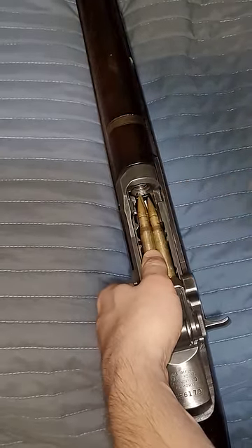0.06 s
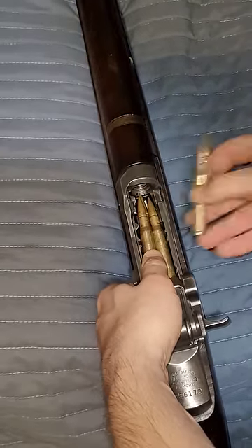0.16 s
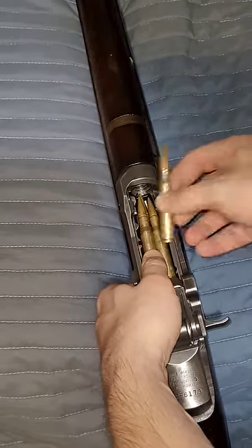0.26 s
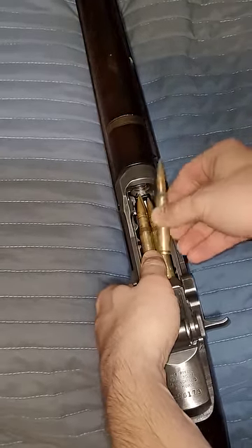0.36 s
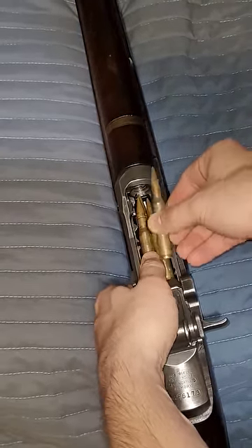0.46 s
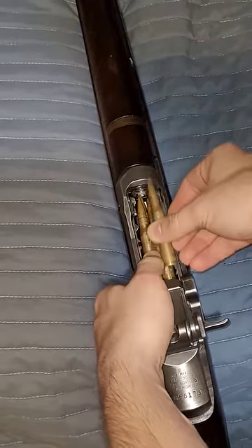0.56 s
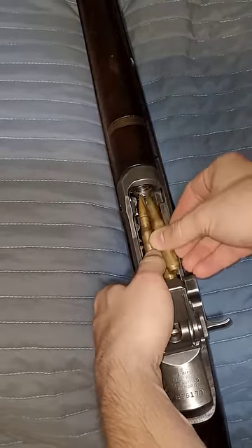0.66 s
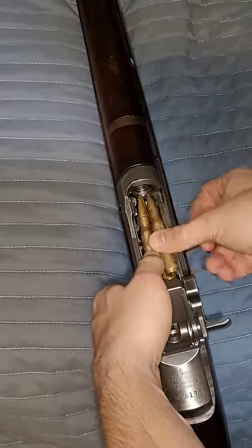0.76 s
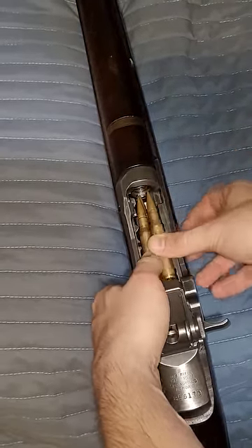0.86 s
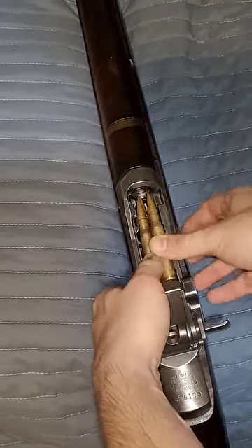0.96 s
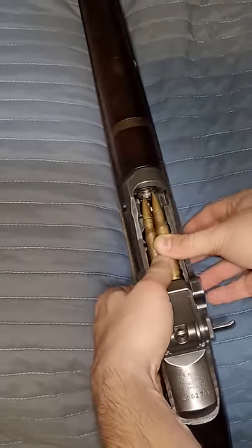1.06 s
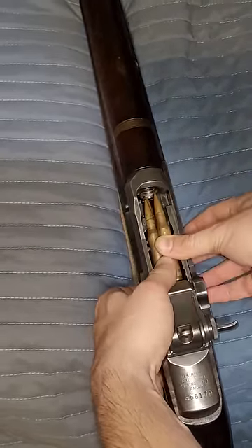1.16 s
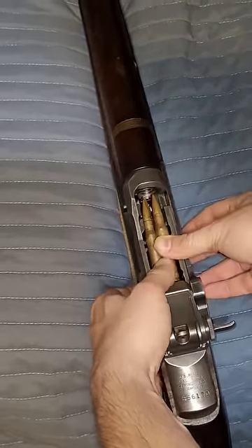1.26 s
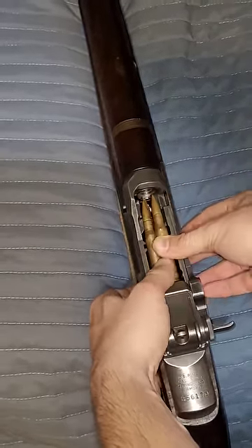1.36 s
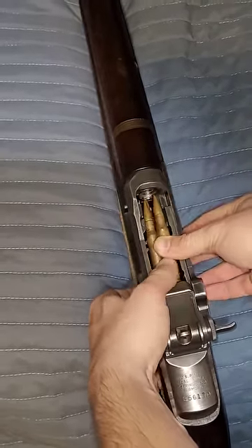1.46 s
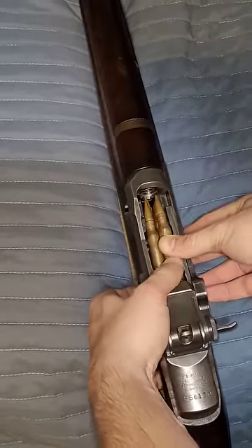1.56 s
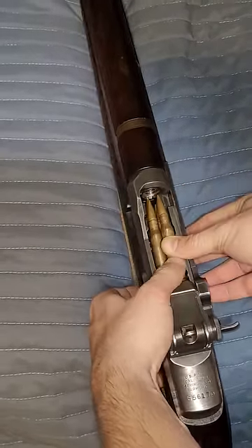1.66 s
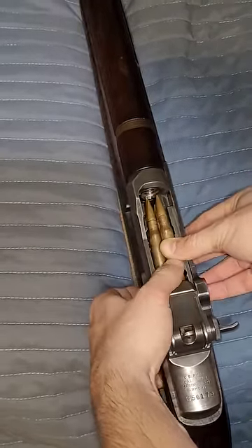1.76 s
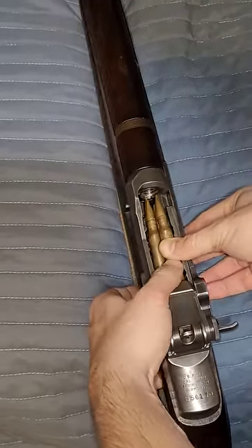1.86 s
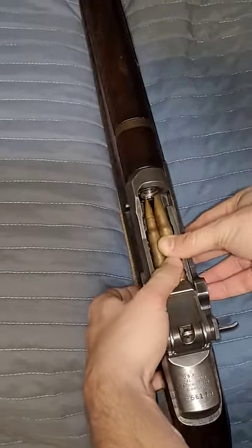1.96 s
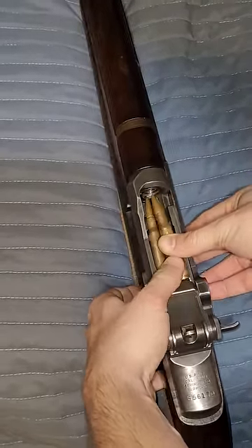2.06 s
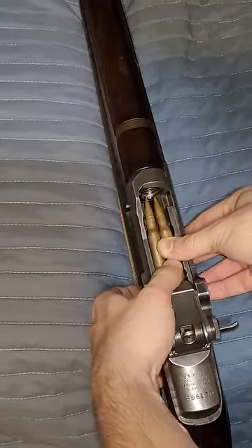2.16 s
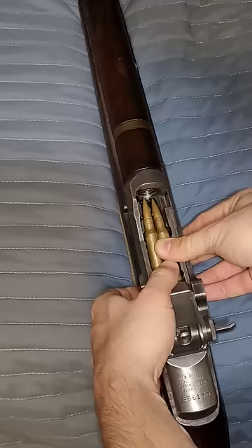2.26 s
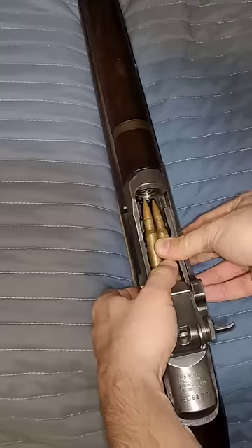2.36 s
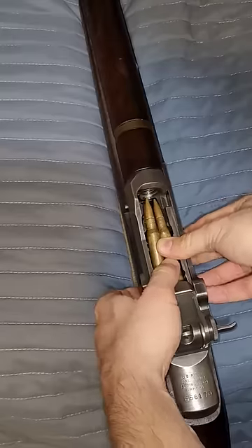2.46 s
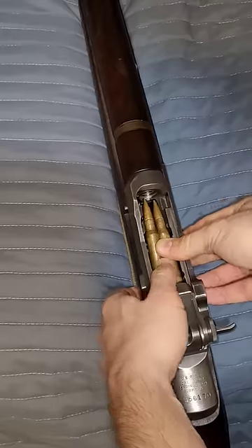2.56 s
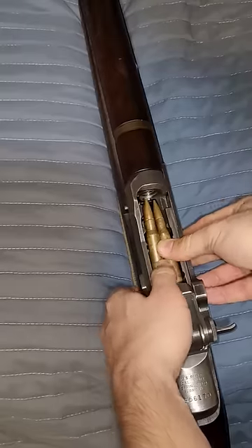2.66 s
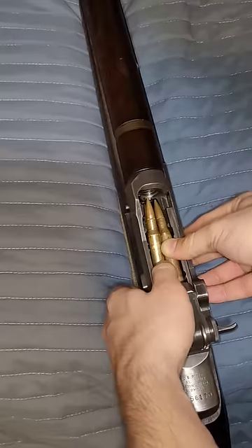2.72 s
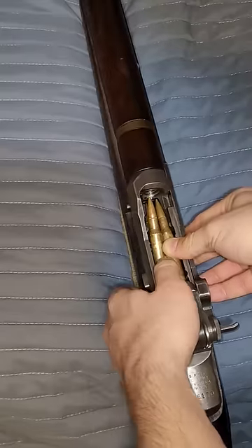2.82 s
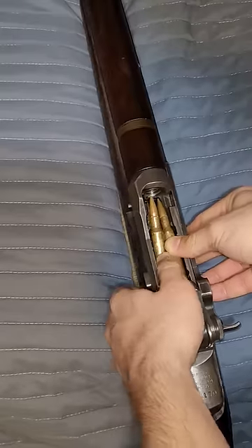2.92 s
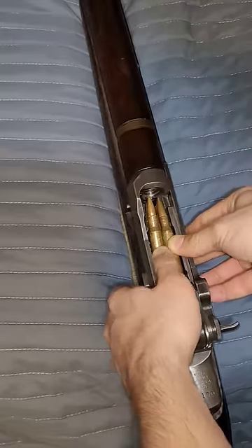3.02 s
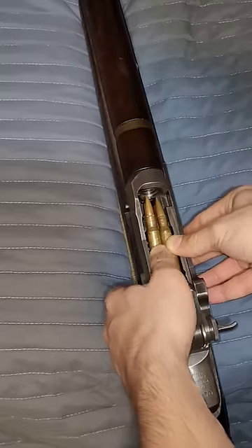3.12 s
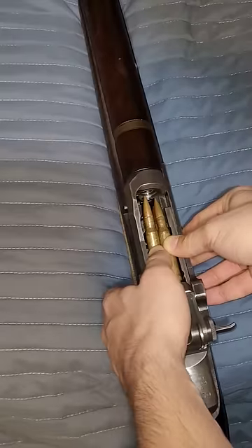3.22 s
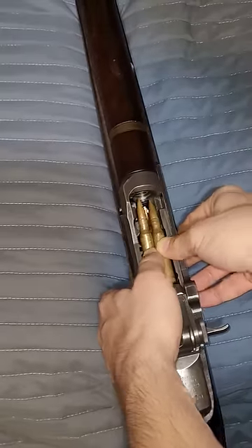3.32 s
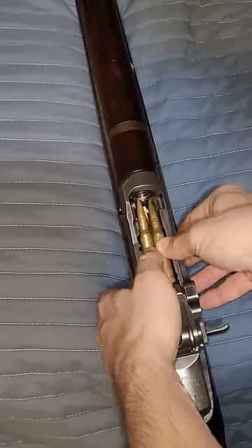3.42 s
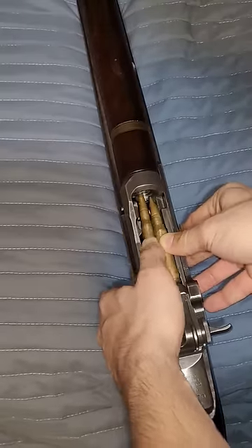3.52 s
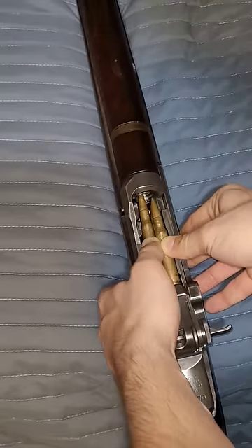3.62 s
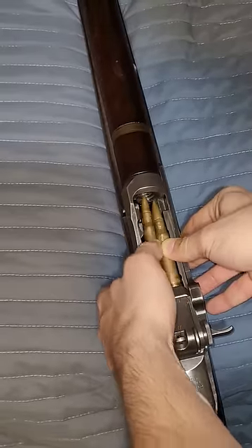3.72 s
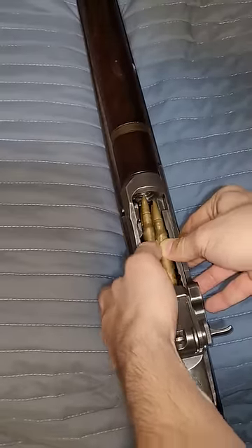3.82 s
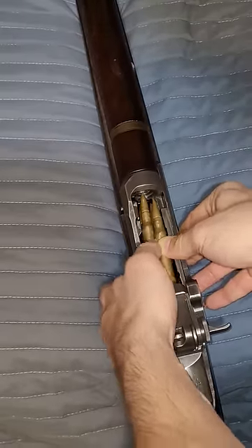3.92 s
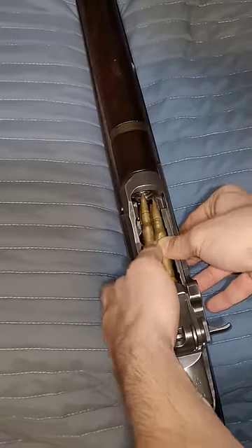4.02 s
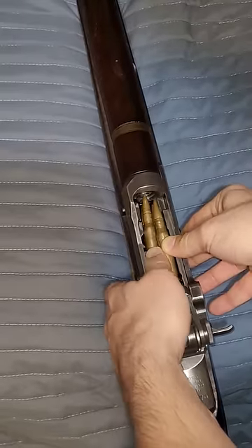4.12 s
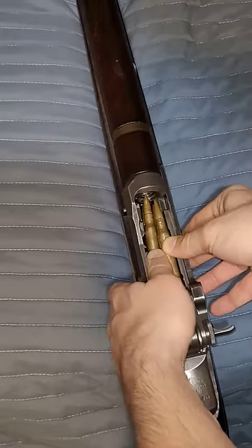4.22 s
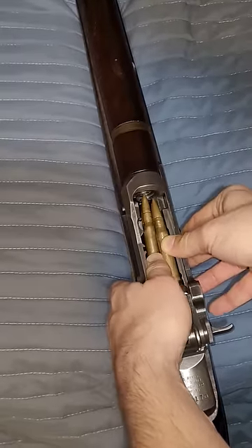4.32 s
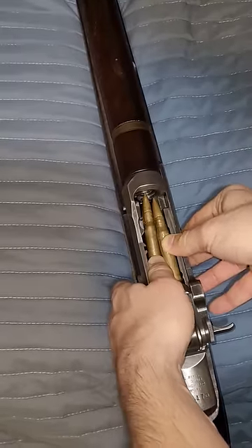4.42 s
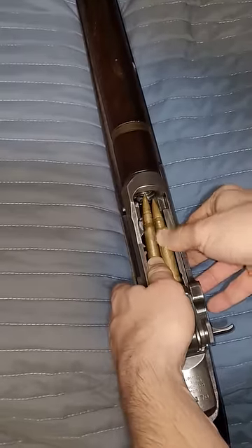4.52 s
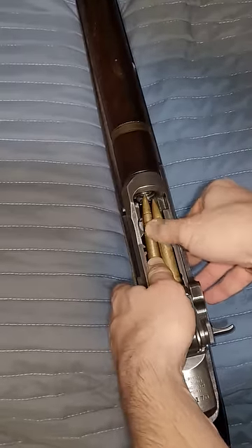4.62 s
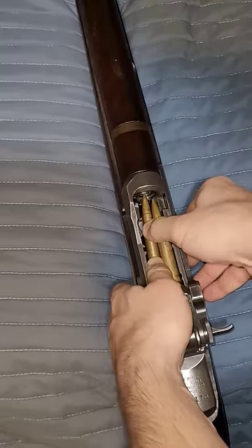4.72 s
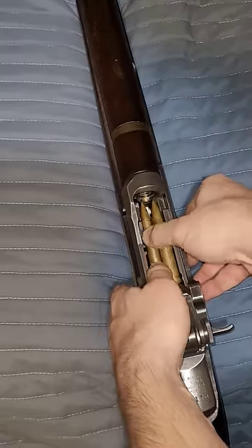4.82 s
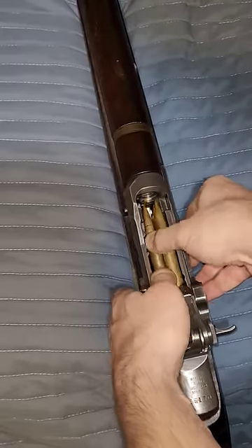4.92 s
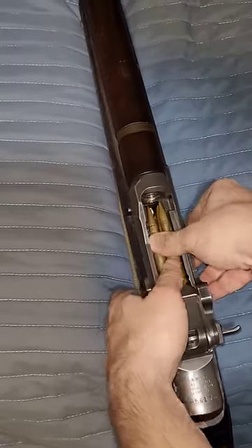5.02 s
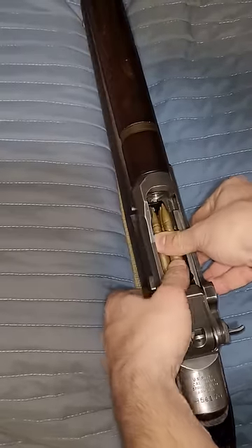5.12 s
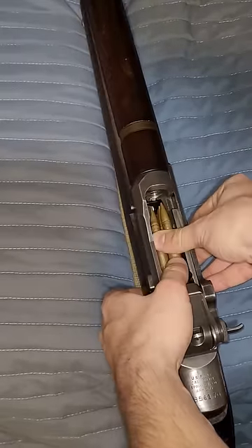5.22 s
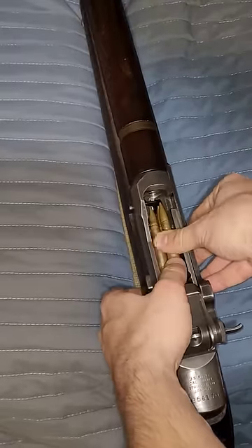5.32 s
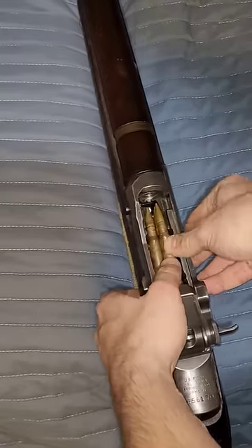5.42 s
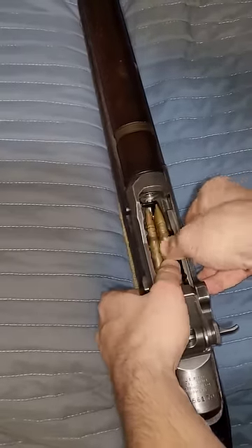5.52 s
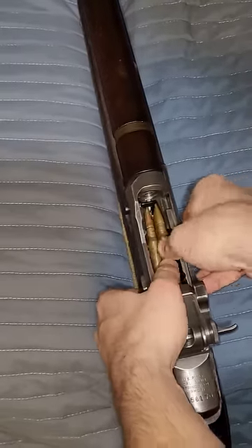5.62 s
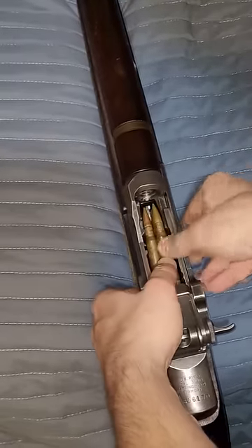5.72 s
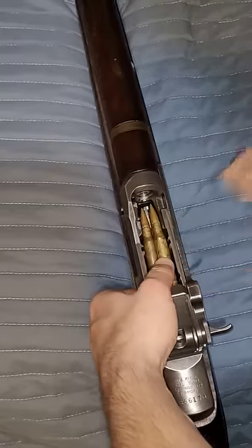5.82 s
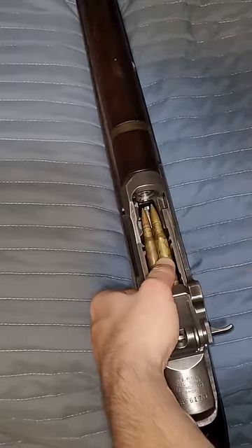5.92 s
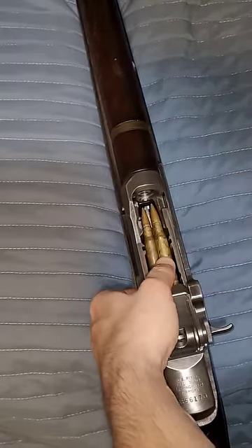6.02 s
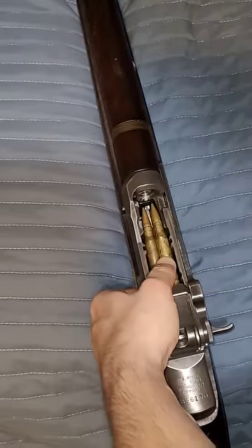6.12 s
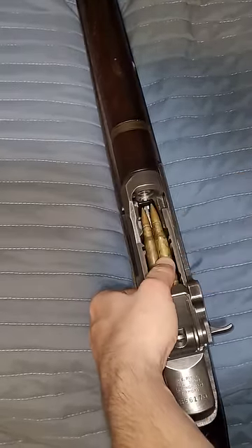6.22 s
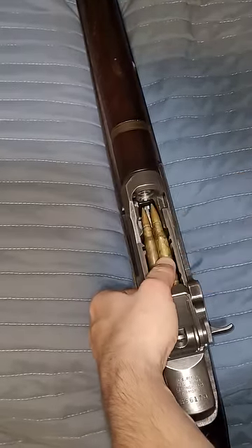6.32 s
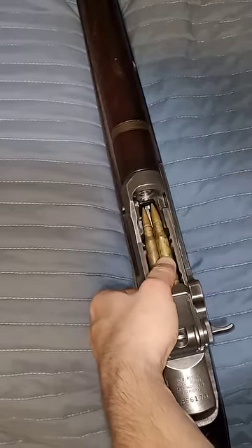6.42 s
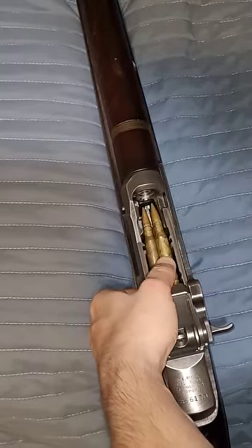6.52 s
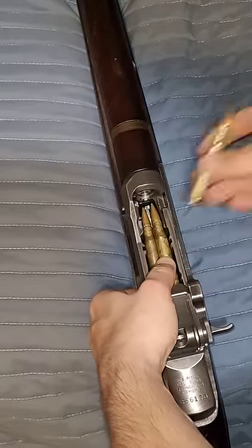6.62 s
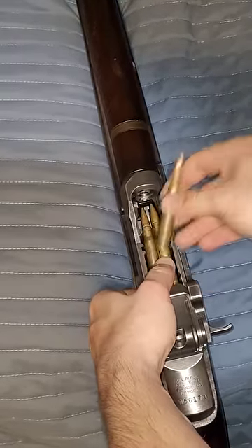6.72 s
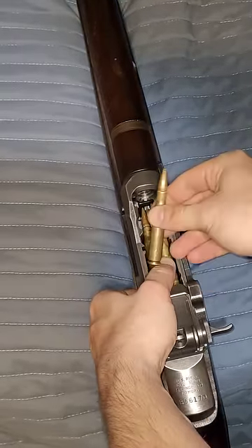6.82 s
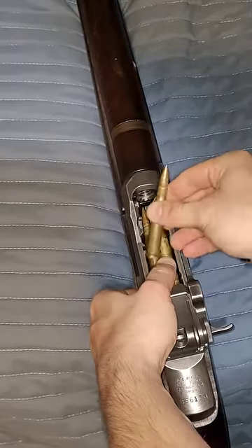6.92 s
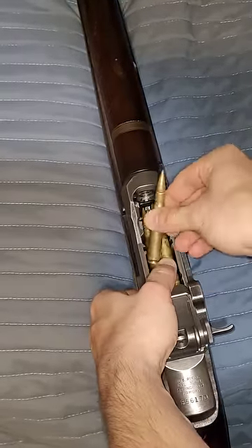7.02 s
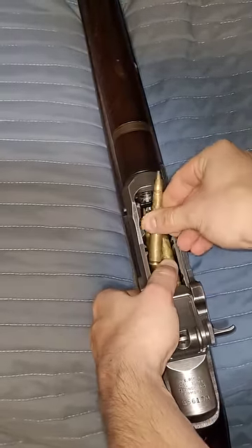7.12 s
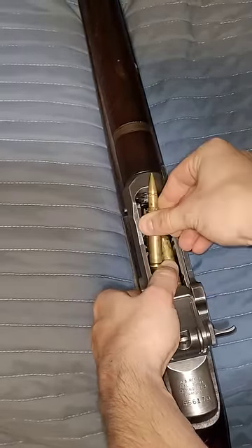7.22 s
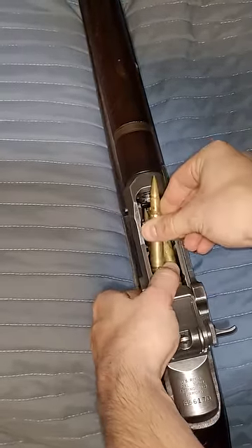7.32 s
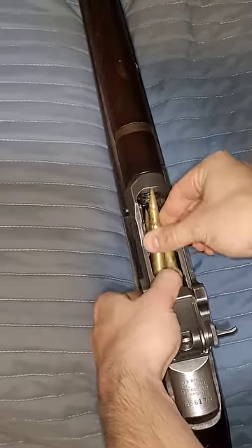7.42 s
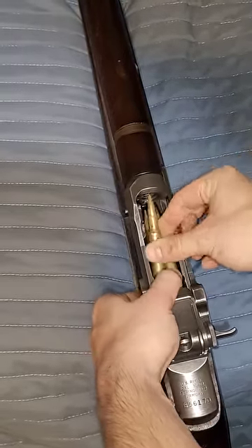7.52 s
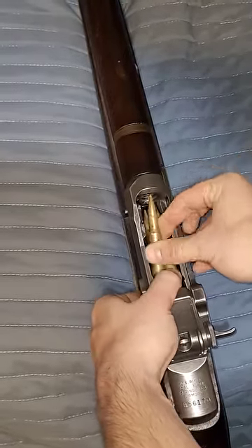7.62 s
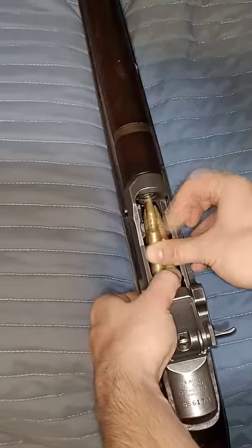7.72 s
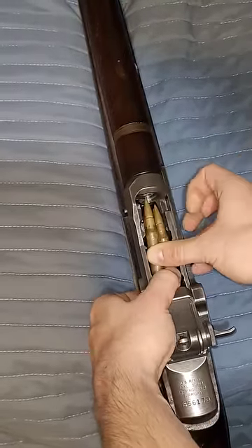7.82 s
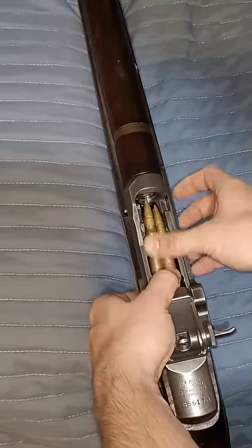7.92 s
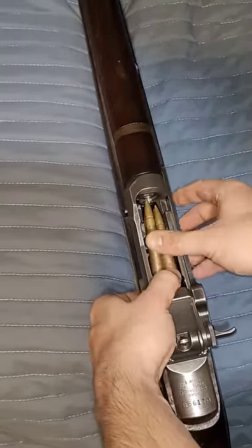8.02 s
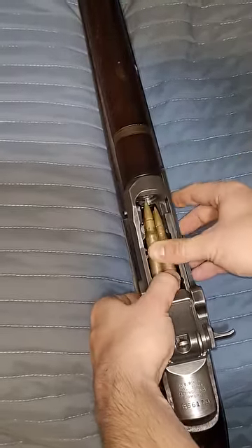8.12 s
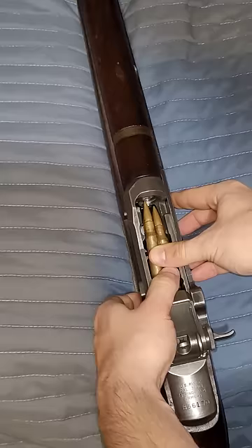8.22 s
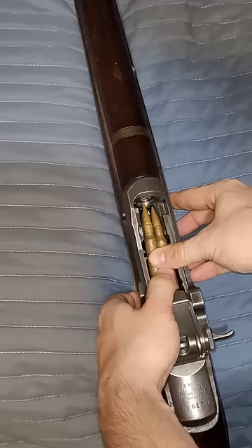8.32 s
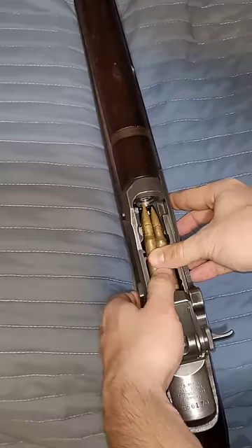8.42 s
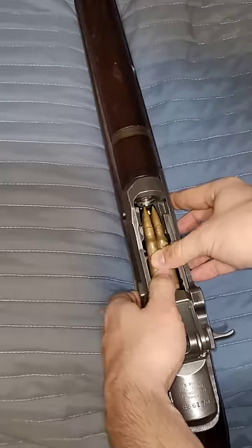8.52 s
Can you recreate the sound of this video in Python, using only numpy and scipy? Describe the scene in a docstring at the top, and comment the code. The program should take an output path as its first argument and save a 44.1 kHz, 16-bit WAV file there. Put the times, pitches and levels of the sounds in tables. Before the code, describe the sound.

Close to a stereo microphone in a small, softly furnished room, cartridges are thumbed into a steel rifle magazine. Crisp, dry clicks and small rattles come irregularly, with one bright hard snap near the start and short gritty scrapes. After a pause, loose rounds jingle lightly, more clicks follow, and the loudest clack brings a metallic clang and dull thud. Small ticks end it over a constant low fan hum.

```python
"""Loading a rifle magazine

Brass cartridges are thumbed into the steel magazine of a rifle that lies on a bed, close to two microphones.
Each contact is a dry click: shaped noise bursts excite case resonances, then the steel receiver and room ring.
Cases scrape as trains of tiny slips, hard blows add a clang and a thud, and spare rounds jingle once as
dying modes. A hand brushes the quilt as filtered noise; a fan of sine lines and noise hums in the small, soft room."""
import sys
import numpy as np
from scipy import signal
from scipy.fft import rfft, irfft
from scipy.io import wavfile
from scipy.ndimage import uniform_filter1d

SR = 44100
rng = np.random.default_rng(int(sys.argv[2]) if len(sys.argv) > 2 else 0)


def unload_audio(sound):
    """Save the sound as a 16-bit wav file, at the path given as the first command line argument."""
    columns = np.transpose(np.atleast_2d(sound))
    # keep every value between -1 and 1, then stretch to whole-number steps
    steps = np.round(np.clip(columns, -1, 1) * 32767)
    wavfile.write(sys.argv[1], SR, steps.astype(np.int16))


N = 377937  # length of the scene [samples]
TAPS = 2048  # length of a burst and of a colouring filter [samples]
HZ = np.fft.rfftfreq(TAPS, 1 / SR)  # frequency grid of every gain curve [Hz]
LEVEL_SAMPLES = 220  # the level of a short blow is its rms over this span [samples]

# broad resonances of a case held against the steel: (frequency [Hz], width [Hz], level [dB])
CASE_RESONANCES = [(690, 210, 0.5), (1190, 82, -5), (1355, 160, 4), (1892, 200, -2), (2290, 240, 1),
                   (3200, 410, -1), (3820, 560, 1), (4430, 390, 1), (5340, 490, 3), (6027, 450, 2.5),
                   (6900, 800, -4.5), (8340, 930, -4), (9210, 400, -6), (11180, 1700, -12.5),
                   (13550, 1680, -8.5)]


def clicks(same=.7, place_db=2.5, valley_db=-21, grip_width=0.88, ping_db=6):
    """Impact excitation: a blow and its fast chatter sound a low knock, a main clack and a bright tick, then ring on."""
    # a cartridge snaps against the steel or its neighbours: (time [s], clack level [dB], clack pitch [Hz],
    # clack breadth [octaves], knock and tick [dB re clack, before their trims],
    # chatter [ms, before the shortest length is added])
    snaps = [(0.427, -28, 3840, 0.52, -32, -9.5, 1.04), (0.5852, -44.5, 2720, 0.99, -16, -12, 3.8),
             (0.64, -43, 3300, 1.2, -18, -24, 2.2), (0.7124, -25, 2940, 2.2, -6, -1, 0.92),
             (0.7195, -21.5, 3400, 2.2, -20.5, -4, 2.5), (0.9167, -13, 7850, 1.09, -31, -0.5, 0.94),
             (1.063, -56, 3400, 0.88, -0.5, 2.5, 1.2), (1.1526, -37.5, 4100, 0.6, -14, -2.5, 1.5),
             (1.2677, -47.5, 2360, 0.9, -4, -7.5, 2.3), (1.6042, -44.5, 2320, 0.59, -7, -11.5, 0.9),
             (1.6262, -38, 3200, 0.53, -28, -24, 0.35), (1.7136, -47.5, 2400, 0.78, -13, -21, 2.1),
             (1.844, -40.5, 3090, 0.92, -21.5, -13.5, 0.75), (2.0207, -31.5, 3730, 0.55, -16, -10, 0.55),
             (2.0402, -30.5, 2950, 1.9, -10.5, -11, 5.6), (2.0467, -23, 5260, 1.7, -19, -12, 0.66),
             (2.0883, -39.5, 2700, 1.3, -6, -9, 1.3), (2.1544, -34.5, 2590, 1.7, -4.5, -2, 1.3),
             (2.1637, -30.5, 2500, 0.91, -8, -18, 3), (2.1755, -28.5, 5900, 2.1, -19, -12, 0.62),
             (2.341, -40, 2360, 0.88, -6, -11.5, 1.15), (2.7357, -20, 5720, 1.08, -29.5, -18.5, 0.22),
             (2.988, -17.5, 5600, 0.83, -25.5, -16, 0.37), (3.5304, -20.5, 6670, 0.47, -25.5, -18, 0.4),
             (3.54, -24.5, 6700, 2.6, -11.5, 1.5, 3.3), (3.5505, -24.5, 5500, 2.6, -21, -6, 0.63),
             (3.6015, -47.5, 3200, 2, -22, -15, 0.9), (3.6453, -54.5, 2500, 2.2, 1.5, -2.5, 1.7),
             (3.8093, -41.5, 6500, 2.3, -26.5, -20, 1.2), (4.1615, -37, 5770, 0.31, -23, -12, 0.22),
             (4.4637, -28.5, 5370, 0.82, -20, -21.5, 0.25), (4.8352, -37, 2900, 0.76, -24, -18, 1.1),
             (4.8744, -42.5, 2500, 3, -14, -13, 0.5), (4.9438, -38, 2660, 0.89, -21, -17, 0.5),
             (5.0355, -51, 6300, 2.2, -4, -6.5, 1.25), (5.332, -40, 2290, 0.86, -20, -32, 0.67),
             (5.3563, -43.5, 6500, 2.5, -19, -23, 1.3), (5.4345, -53.5, 2300, 0.9, -12.5, -37.5, 1.8),
             (5.566, -55, 2310, 0.9, -7, -14.5, 1.7), (5.747, -30.5, 2400, 2.2, -23, -15, 1.1),
             (6.9092, -28.5, 3290, 1.6, -27, -16, 0.49), (6.93, -28.5, 4000, 0.7, -17.5, -20, 0.63),
             (6.9935, -26.5, 3020, 1.36, -22, -19, 4.3), (7.0867, -52, 5610, 1.5, -12, -13.5, 0.54),
             (7.5095, -24.5, 4150, 3.4, -20.5, -6.5, 2.15), (7.7924, -13, 6170, 3.1, -15, -1.5, 1.54),
             (8.2349, -43.5, 2400, 0.56, -4, -16, 0.69), (8.2875, -36.5, 2250, 1.2, -15, -15, 1.4),
             (8.3676, -37.5, 3000, 1.6, -11.5, -8, 1.8), (8.3897, -33.5, 3500, 0.8, -23, -15, 0.59),
             (8.4745, -50.5, 2290, 0.92, -17.5, -35, 1.2)]
    # ringing of the steel receiver: (frequency [Hz], level [dB], varied at each blow)
    steel_modes = [(2100, -6), (2291, -3), (2790, -5.5), (3850, -3.5), (4215, -8), (4352, -4.5),
                   (4690, -4.5), (4854, -5.5), (5220, -2), (5327, -7), (5981, -7.5), (6299, -5.5),
                   (6846, -4.5), (7644, -6.5), (8284, 0), (8646, 1.5), (9095, -1.5)]
    steel_t60 = .17  # s
    knock_trim_db, tick_trim_db, tick_left_db = 1, -1, 1  # the tick is tilted towards the left
    knock_ms = 3  # extra decay time of the knock
    soft_db, soft_hz, hard_db, hard_hz = -42, 9500, -22.5, 15000
    steel_db, room_db = -12, -1  # shares of the after-ring
    ring_at_db, ring_db_there, ring_db_per_db = -36, -8, -0.03  # a firmer thumb damps the after-ring more
    out, ms = np.zeros((2, N)), np.arange(TAPS) * 1000 / SR
    for s, db, centre_hz, octaves, knock, tick, chatter_ms in snaps:
        # every grip shifts and weights the resonances a little; a struck case is held more loosely than a sliding one
        stretch = rng.uniform(.98, 1.02)
        grip = [(hz, width * grip_width, level + place_db * rng.standard_normal())
                for hz, width, level in CASE_RESONANCES]
        shape = resonances(grip, stretch, valley_db)
        top_hz = np.interp(db + tick, [soft_db, hard_db], [soft_hz, hard_hz])  # harder contacts reach higher

        low = unit(shape * band(630, 1800, order=6))
        clack = unit(shape * band(2100, 7500) * contact(centre_hz, octaves) * ping(centre_hz, ping_db))
        bright = unit(shape * band(7500, 15000, order=16) * band(1, top_hz, order=6))

        blow, crowd, length_ms = contacts(chatter_ms, same)
        shudder = rattled(np.exp(-ms / (knock_ms + length_ms)), same)  # the heavy stock settles more slowly
        tick_gain = gain_of(tick + tick_trim_db + tick_left_db * np.array([[1], [-1]]))
        sound = unit(coloured(blow, clack))
        sound += gain_of(knock + knock_trim_db) * unit(coloured(shudder, low))
        sound += tick_gain * unit(coloured(rattled(crowd, 0.26), bright))

        size = gain_of(db) * np.sqrt(LEVEL_SAMPLES)
        after = gain_of(steel_db) * ringing(steel_modes, steel_t60) + gain_of(room_db) * room()
        ring_db = ring_db_there + ring_db_per_db * (db - ring_at_db)
        click_colour = clack + gain_of(knock) * low + gain_of(tick) * bright
        add(out, s - TAPS / SR, size * swell(click_colour, same))
        add(out, s, size * sound)
        add(out, s, size * gain_of(ring_db) * signal.fftconvolve(sound, after, axes=1))
    return out


def contacts(chatter_ms, same, first_db=-5, shortest_ms=0.38):
    """Repeated impact: a first touch, a crowd of fast contacts, then up to four weak ones as the case settles."""
    settle_db, settle_s = -18.5, 0.014  # each settling waits 0.5 to 2 times settle_s
    settles_per_chatter_ms = 1.7  # a contact that chatters also rocks a few times more
    ms = np.arange(TAPS) * 1000 / SR
    length_ms = chatter_ms + shortest_ms
    crowd = np.sqrt(ms / length_ms) * np.exp(-1.5 * ms / length_ms)  # the contacts crowd in, then die away
    first = gain_of(first_db) * (ms == 0) / (.5 + length_ms ** 2)  # a short snap is mostly one blow
    blow = first + rattled(crowd, same)
    settled = blow.copy()
    for k, wait in enumerate(rng.uniform(.5, 2, size=4)):
        share = np.clip(settles_per_chatter_ms * chatter_ms - k, 0, 1)
        add(settled, wait * settle_s, share * gain_of(settle_db) * blow)
    return settled, crowd, length_ms


def rattled(envelope, same, size=28):
    """Broadband excitation: a short noise burst whose energy is spread evenly over the spectrum."""
    spectrum = rfft(pair(TAPS, same) * envelope)
    power = uniform_filter1d(abs(spectrum) ** 2, size, axis=1)
    even = irfft(spectrum / np.sqrt(power + 1e-9), TAPS)
    return unit(even * (np.arange(TAPS) < TAPS // 2))


def swell(colour, same, swell_db=-18.5, growth_s=0.0049):
    """Swelling noise: a short, faint rush in the click's own colour rises up to each click."""
    rise = np.exp(-np.arange(TAPS)[::-1] / SR / growth_s)
    return gain_of(swell_db) * unit(coloured(pair(TAPS, same) * rise, colour))


def ping(hz, db, width=0.071):
    """Resonance: the struck case adds a peak of its own, with a half-width that is a share of its pitch."""
    return np.sqrt(1 + (gain_of(db) ** 2 - 1) / (1 + ((HZ - hz) / (width * hz)) ** 2))


def follower(clang_t60=.07, stock_t60=0.12):
    """Modal decay: a hard seating makes the sprung follower clang and the wooden stock thud on the bed."""
    # a round seats hard and shakes the whole rifle: (time [s], clang level [dB], thud level [dB])
    seatings = [(0.7134, -45, -45.5), (0.9163, -32.5, -54), (7.7927, -22, -43)]
    # modes of the spring-loaded follower: (frequency [Hz], level [dB], varied at each blow)
    clang_modes = [(2098, -1.5), (2165, -4), (2232, -1.5), (2285, 1), (2370, -5.5)]
    # modes of the wooden stock: (frequency [Hz], level [dB], varied at each blow)
    stock_modes = [(215, -0.5), (275, 1), (350, -2.5), (430, -7)]
    out = np.zeros((2, N))
    for s, clang_db, thud_db in seatings:
        add(out, s, gain_of(clang_db) * ringing(clang_modes, clang_t60))
        add(out, s, gain_of(thud_db) * ringing(stock_modes, stock_t60)[:1])  # bass is alike at both microphones
    return out * np.sqrt(LEVEL_SAMPLES)


def slides(slips_per_s=380, uneven_db=4, rub_db=-22, top_db=-23, room_db=-3):
    """Stick-slip: a sliding case catches and slips, each slip a tiny click of its own size in the same metal."""
    # brass sliding on steel: (start [s], end [s], level before the room [dB], centre [Hz])
    scrapes = [(0.431, 0.498, -53.5, 3670), (0.554, 0.683, -56, 3240), (1.091, 1.151, -63, 1700),
               (1.984, 2.115, -46, 4160), (2.133, 2.177, -47, 4180), (3.528, 3.561, -42, 5330),
               (3.605, 3.702, -63, 5060), (3.752, 3.806, -70.5, 6520), (5.361, 5.389, -59.5, 3200),
               (6.93, 6.97, -46.5, 3500), (7.361, 7.447, -65, 4100), (7.458, 7.526, -54.5, 4300),
               (8.198, 8.32, -66, 3500), (8.352, 8.399, -51, 3770)]
    out = np.zeros((2, N))
    for start, end, db, centre_hz in scrapes:
        count = max(round((end - start) * SR), 64)
        sizes = gain_of(uneven_db * np.minimum(rng.exponential(1, count), 3))
        slips = sizes * (rng.random(count) < slips_per_s / SR) + gain_of(rub_db)  # over a steady rub
        drive = slips * pair(count, .6) * signal.windows.tukey(count, .5)
        place = contact(centre_hz, 0.71) + gain_of(top_db)
        sound = coloured(drive, resonances(CASE_RESONANCES) * band(650, 15000) * place)
        add(out, start, gain_of(db) * np.sqrt(count) * unit(sound))
    return out + gain_of(room_db) * signal.fftconvolve(out, room(), axes=1)[:, :N]


def jingle(ring_trim_db=1.0, rasp_trim_db=-1, room_db=-5, count=3):
    """Free vibration: loose rounds roll together, bounce and ring as one is picked up, until fingers damp them."""
    # spare rounds touch: (time [s], level before trims [dB], pitch of the ringing round [Hz],
    # rasp [dB re level, before its trim])
    clinks = [(6.128, -56, 4350, -3.5), (6.148, -60.5, 4350, 5), (6.176, -52.5, 4126, -9),
              (6.194, -59.5, 4126, 7.5), (6.271, -55, 4126, 4.5), (6.289, -37.5, 4350, -7),
              (6.34, -51.5, 4150, -5), (6.358, -49, 4126, -8), (6.384, -47, 4350, -14)]
    # broad resonances of loose brass rubbing on brass: (frequency [Hz], width [Hz], level [dB])
    brass_resonances = [(3500, 1000, -1), (4350, 260, 1), (7080, 520, 4), (8970, 500, 2), (13000, 600, -2),
                        (13900, 1200, -8)]
    round_t60, rasp_s = .17, 0.0027  # s
    rebound_s, rebound_db = 0.008, -7  # mean gap and level change per bounce
    grip_s, grip_decay_s = 6.44, 0.0094  # the fingers close
    out, t = np.zeros((2, N)), np.arange(TAPS) / SR
    for s, db, hz, rasp in clinks:
        for bounce in range(count):
            at = s + bounce * rebound_s * rng.uniform(.7, 1.3)
            size = gain_of(db + bounce * rebound_db) * np.sqrt(LEVEL_SAMPLES)
            rub = pair(TAPS, 0.16) * t * np.exp(-t / rasp_s)
            ring = ringing([(hz, 0), (hz * 2.057, -17)], round_t60)
            scrape = unit(coloured(rub, resonances(brass_resonances) * band(2130, 15000, order=6)))
            add(out, at, size * gain_of(ring_trim_db) * ring)
            add(out, at, size * gain_of(rasp + rasp_trim_db) * scrape)
    out *= np.exp(-np.maximum(np.arange(N) / SR - grip_s, 0) / grip_decay_s)
    heard = out + gain_of(room_db) * signal.fftconvolve(out, room(), axes=1)[:, :N]
    return gain_of([[1], [-1]]) * heard  # a little to the left


def quilt(start_s=5.6, length_s=0.21, brush_db=-72, lo_hz=480, hi_hz=900):
    """Friction noise: a dull swish of skin on cloth as the hand reaches for a spare round."""
    out, count = np.zeros((2, N)), round(length_s * SR)
    swish = coloured(pair(count, .6) * signal.windows.hann(count), band(lo_hz, hi_hz, order=6))
    add(out, start_s, gain_of(brush_db) * np.sqrt(count) * unit(swish))
    return out


def fan(waver=0.04, air_db=-53):
    """Tonal and turbulent noise: slightly wavering motor lines in a dull rush of air."""
    # motor lines: (frequency [Hz], rms level [dB])
    motor_lines = [(58.5, -60), (85, -71.5), (120, -51.5), (178.4, -57.5), (236, -69.5), (298.5, -76),
                   (990, -89)]
    # spectrum of the rush of air: (frequency [Hz], relative density [dB per Hz])
    air_spectrum = [(20, -24), (27, -13), (33, 2.5), (41, -11), (85, -9), (115, -1), (150, -7), (185, -7.5),
                    (350, -15.5), (700, -28), (1500, -34), (3000, -41), (6600, -45.5), (7800, -54)]
    # left-right correlation of the air: (frequency [Hz], correlation [-1 to 1])
    air_likeness = [(60, 0.78), (180, 0.88), (550, 0.69), (1650, -0.62), (4970, 0.4), (15000, -0.8)]
    hz, t = np.fft.rfftfreq(N, 1 / SR), np.arange(N) / SR
    left, other = rfft(rng.standard_normal((2, N)))
    same = np.clip(read(air_likeness, hz), -1, 1)
    right = same * left + np.sqrt(1 - same ** 2) * other
    air = irfft(np.array([left, right]) * gain_of(read(air_spectrum, hz)), N)
    knots, hum = np.linspace(0, t[-1], 30), np.zeros(N)
    for line_hz, db in motor_lines:
        level, drift = (np.interp(t, knots, waver * v) for v in rng.standard_normal((2, len(knots))))
        line = np.sin(2 * np.pi * (line_hz * t + rng.random()) + 2 * drift)
        hum += gain_of(db) * np.sqrt(2) * (1 + level) * line
    return gain_of(air_db) * evened(air) + hum


def room():
    """Reverberation: dense reflections of the small room, each band dying at its own speed."""
    # reverberation time: (frequency [Hz], T60 [s])
    decay_times = [(300, 0.2), (1300, 0.29), (3500, 0.17), (7000, 0.15), (10000, 0.18), (15000, 0.053)]
    count = SR // 3
    hz, t, z = signal.stft(rng.standard_normal((2, count)), SR, nperseg=256)
    decay = gain_of(-60 * t / read(decay_times, hz)[:, None])
    tail = signal.istft(z * decay, SR, nperseg=256)[1][:, :count]
    return unit(tail * (1 - np.exp(-np.arange(count) / SR / 0.0016)))  # reflections build up first


def early_echoes(rifle):
    """Early reflection: delayed, weaker copies join the direct sound."""
    # stock, hands and nearby surfaces: (delay [s], level [dB])
    reflections = [(.0019, -23.5), (.0043, -20.5), (.0062, -16.5), (.0095, -21.5)]
    near = rifle.copy()
    for delay, db in reflections:
        lag_s = rng.uniform(0.0000098, 0.00061)  # each echo reaches the right microphone later by its own lag
        late_right = np.roll(rifle[1], round(lag_s * SR))
        add(near, delay, gain_of(db) * np.array([rifle[0], late_right]))
    return near


def ringing(modes, t60, place_db=2.0):
    """Modal superposition: dying modes, with strengths set by the place struck and phases by the microphone."""
    t = np.arange(SR // 3) / SR
    lines = 0
    for hz, db in modes:
        strength = gain_of(db + place_db * rng.standard_normal())
        lines = lines + strength * np.sin(2 * np.pi * (hz * t + rng.random((2, 1))))
    return unit(gain_of(-60 * t / t60) * lines)


def resonances(modes, stretch=1, valley_db=-15):
    """Resonance curves: gain on HZ of broad peaks over a floor, all shifted by the factor stretch."""
    peaks = sum(gain_of(db) ** 2 / (1 + (2 * (HZ - f * stretch) / w) ** 2) for f, w, db in modes)
    return np.sqrt(gain_of(valley_db) ** 2 + peaks)


def contact(centre_hz, octaves):
    """Modal coupling: the place of contact favours the resonances around one frequency."""
    return 1 / np.sqrt(1 + (np.log2((HZ + 1) / centre_hz) / octaves) ** 4)


def band(lo_hz, hi_hz, order=10):
    """Band-pass filtering: gain on HZ."""
    return 1 / np.sqrt((1 + (lo_hz / (HZ + 1)) ** order) * (1 + (HZ / hi_hz) ** order))


def coloured(x, gain):
    """Causality: a minimum-phase filter of the given gain shape on HZ rings only after the blow."""
    log_gain = np.log(np.maximum(np.r_[gain, gain[-2:0:-1]] / gain.max(), 1e-5))
    response = np.fft.ifft(np.exp(np.conj(signal.hilbert(log_gain)))).real
    return signal.fftconvolve(x, response[None], axes=1)


def pair(count, same):
    """Partial coherence: two channels of noise that share a part of their power."""
    shared, left, right = rng.standard_normal((3, count))
    same = np.clip(same, 0, 1)
    return np.sqrt(same) * shared + np.sqrt(1 - same) * np.array([left, right])


def gain_of(db):
    """Logarithmic level: decibels to amplitude gain."""
    return 10 ** (np.asarray(db) / 20)


def evened(x):
    """Power normalization: scales to rms 1."""
    return x / np.sqrt(np.mean(x ** 2) + 1e-20)


def unit(x):
    """Energy normalization: scales each channel to energy 1."""
    return x / np.sqrt(np.sum(x ** 2, axis=-1, keepdims=True) + 1e-20)


def read(points, hz):
    """Logarithmic pitch: joins (Hz, value) points on a log-frequency axis."""
    f, value = np.transpose(points)
    return np.interp(np.log(hz + 1), np.log(f + 1), value)


def add(mix, s, sound):
    """Superposition: mixes a sound in at time s [s]."""
    part = mix[:, round(s * SR):][:, :sound.shape[1]]
    part += sound[:, :part.shape[1]]


def scene():
    """Superposition: the rifle and its first echoes, a little nearer the left microphone, over the fan."""
    near = early_echoes(clicks() + follower() + slides())
    near[1] = np.roll(near[1], 2)  # the right microphone hears it two samples later
    return near * gain_of([[.2], [-.2]]) + jingle() + quilt() + fan()


def record(dry):
    """Saturation and band limiting: the recorder rounds off the highest peaks, then removes the extreme treble."""
    rounded = np.tanh(dry)
    low_pass = signal.firwin(161, 15500, window=("kaiser", 9), fs=SR)  # cutoff in Hz
    return signal.oaconvolve(rounded, low_pass[None], "same", axes=1)


dry = scene()
out = record(dry)
unload_audio(out)
```